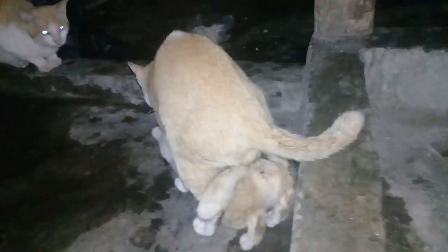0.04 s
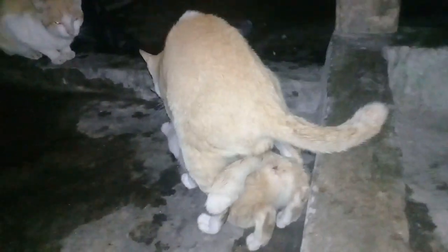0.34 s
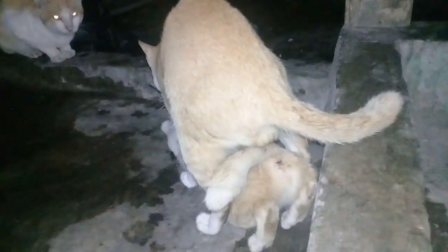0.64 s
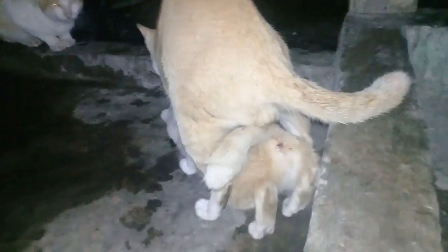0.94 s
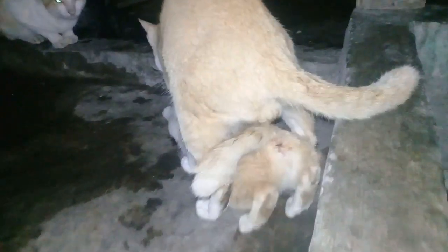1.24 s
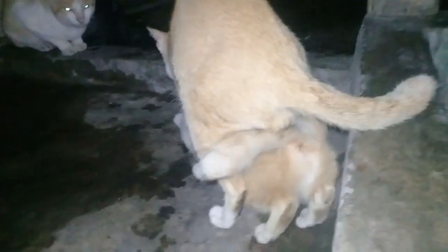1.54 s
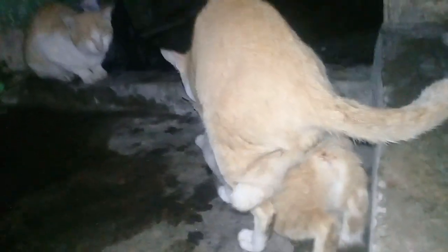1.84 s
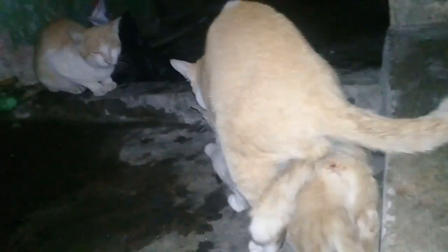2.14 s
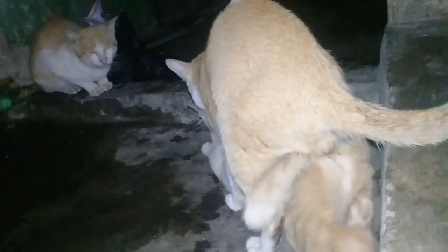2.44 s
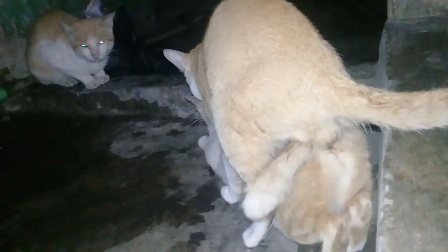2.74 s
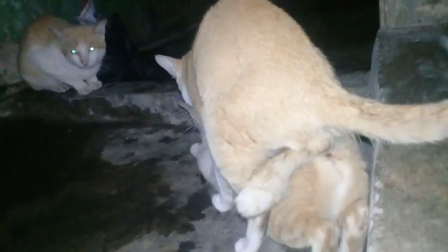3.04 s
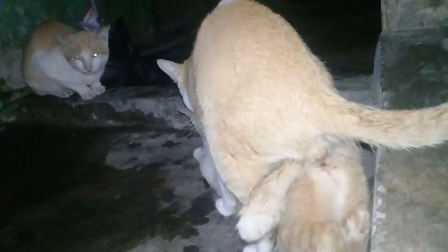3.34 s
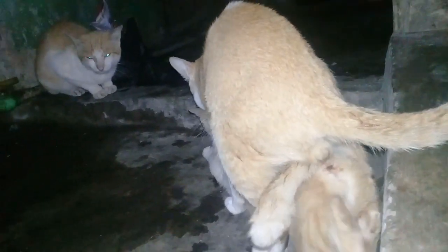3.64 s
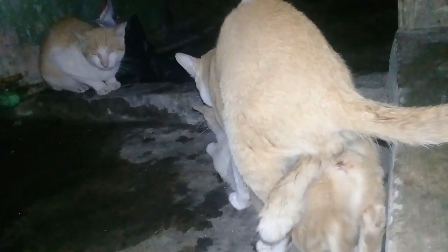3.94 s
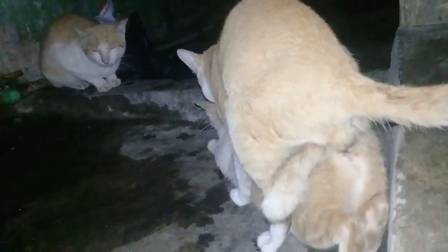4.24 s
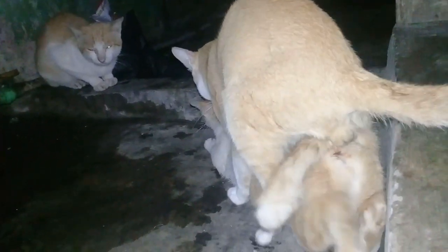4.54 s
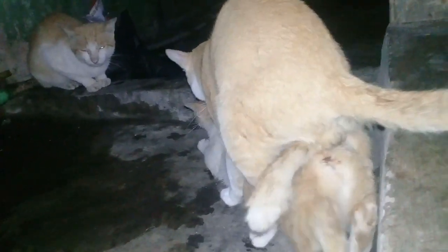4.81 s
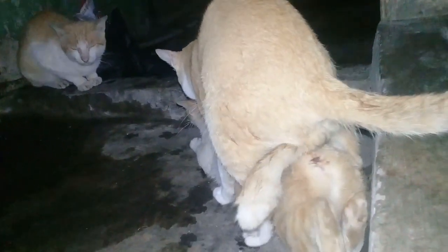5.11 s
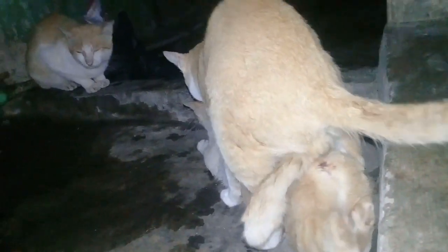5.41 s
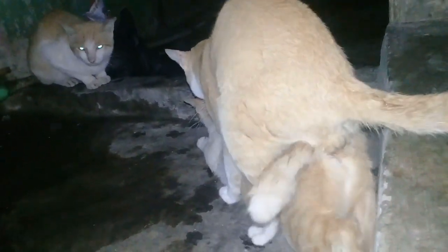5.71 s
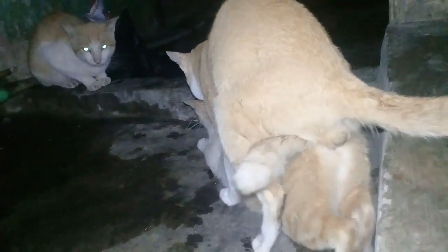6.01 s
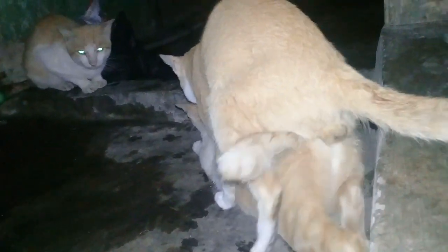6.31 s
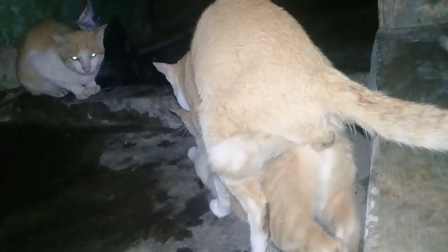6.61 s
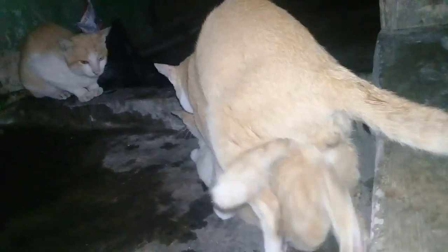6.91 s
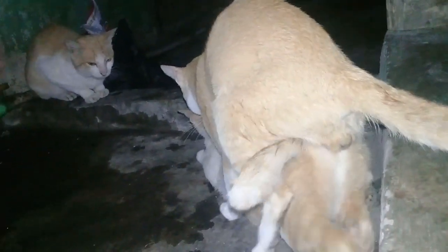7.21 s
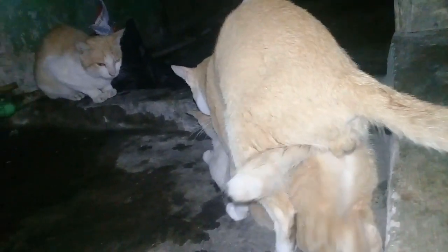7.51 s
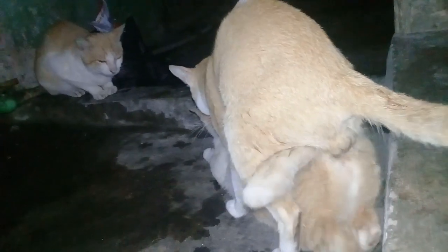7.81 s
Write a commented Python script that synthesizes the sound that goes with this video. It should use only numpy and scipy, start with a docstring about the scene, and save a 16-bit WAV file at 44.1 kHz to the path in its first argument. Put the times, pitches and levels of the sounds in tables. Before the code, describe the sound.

Two crickets chirp fast and high throughout, over a faint distant rumble in a yard at night. Close to the microphone, a cat gives a few small whimpers, then a moan that sinks into a low rough growl. After a pause it growls again, and after another it lets out a louder long yowl that rises and falls. A soft paw scuff and a few claw ticks sound on concrete.

```python
"""Cat yowling in a yard at night

Close to one microphone, a cat whimpers, moans down into a growl, growls again, then gives a loud
arching yowl. Its vocal folds run clean at high pitch and fall into strong-weak, uneven pulses when
low. Two crickets, one near and one farther off, scrape their wings throughout, each at its own rate.
Paws scuff and tick on the concrete, over a faint far rumble."""
import sys
import numpy as np
from scipy import signal
from scipy.fft import rfft, irfft, next_fast_len
from scipy.io import wavfile
from scipy.ndimage import uniform_filter1d

SR = 44100
rng = np.random.default_rng(int(sys.argv[2]) if len(sys.argv) > 2 else 0)


def digitize_waveform(pressure):
    """Quantize a signal to 16-bit integers and store it at the path in sys.argv[1].

    Rows of a 2-D input are taken as channels; values are limited to [-1, 1].
    """
    field = np.atleast_2d(pressure).T
    bounded = np.clip(field, -1, 1)
    quanta = np.round(bounded * 32767).astype(np.int16)
    wavfile.write(sys.argv[1], SR, quanta)


N = 346613
TIME = np.arange(N) / SR


def gain_of(db):
    """Decibels to gain."""
    return 10 ** (np.asarray(db) / 20)


def unit_rms(x):
    """Scales to rms 1."""
    return x / np.sqrt(np.mean(x ** 2) + 1e-20)


def levelled(x, span_s=0.35):
    """Holds the running rms at 1."""
    size = max(int(span_s * SR), 8)
    power = uniform_filter1d(uniform_filter1d(x ** 2, size), size)
    return x / np.sqrt(abs(power) + 1e-14)


def add(mix, s, sound):
    """Mixes a sound in at time s."""
    part = mix[max(round(s * SR), 0):][:len(sound)]
    part += sound[:len(part)]


def swell(curve):
    """Gain along (time [s], level [dB]) points, silent outside them."""
    s, db = np.transpose(curve)
    edges = np.clip(np.minimum(TIME - s[0], s[-1] - TIME) / 0.0027, 0, 1)
    return gain_of(np.interp(TIME, s, db)) * edges


def gate(start, end, attack_s, release_s=.02):
    """Rises from start, holds at 1, and dies away after end."""
    return np.clip((TIME - start) / attack_s, 0, 1) * np.exp(-np.clip((TIME - end) / release_s, 0, 20))


def band(x, lo_hz, hi_hz, order=2):
    """Band-pass."""
    return signal.sosfilt(signal.butter(order, [lo_hz, hi_hz], "band", fs=SR, output="sos"), x)


def colour(x, points):
    """Minimum-phase filter through (frequency [Hz], gain [dB]) points."""
    hz, db = np.transpose(points)
    f = abs(np.fft.fftfreq(8192, 1 / SR))
    log_gain = np.log(gain_of(np.interp(np.log(f + 1), np.log(hz), db)))
    taps = np.fft.ifft(np.exp(np.conj(signal.hilbert(log_gain)))).real
    return signal.oaconvolve(x, taps[:len(f) // 2])[:len(x)]


def resonate(x, hz, width_hz):
    """A resonance that follows the curve hz, applied twice for steep skirts."""
    turn = np.exp(2j * np.pi * np.cumsum(hz) / SR)
    r = np.exp(-np.pi * width_hz / SR)
    return 2 * (turn * signal.lfilter([(1 - r) ** 2], [1, -2 * r, r * r], x / turn)).real


def wander(per_s):
    """Smooth random drift of rms 1."""
    size = next_fast_len(N, True)
    f = np.fft.rfftfreq(size, 1 / SR)
    return unit_rms(irfft(rfft(rng.standard_normal(size)) * np.exp(-(f / per_s) ** 2), size)[:N])


def yard(x, t60, delay_s=.004, before="constant"):
    """Scattered echoes off walls and ground; before="wrap" for a song that is already going."""
    t = np.arange(SR // 2) / SR
    reflections = rng.standard_normal(len(t)) * (rng.random(len(t)) < .1)
    taps = reflections * gain_of(-60 * t / t60) * (t > delay_s)
    return signal.oaconvolve(np.pad(x, (len(t) - 1, 0), before), taps / np.linalg.norm(taps), "valid")


# night air over the yard: (frequency [Hz], relative level [dB])
AIR_SPECTRUM = [(20, -23.5), (50, -6.5), (110, 1.5), (170, -3.5), (250, -15.5), (400, -24), (800, -27),
                (1800, -31.5), (2500, -27.5), (3300, -33.5), (5000, -37), (9500, -37.5), (14000, -36.5)]
# a hum in the distance: (pitch [Hz], relative level [dB])
FAR_HUM = [(113.0, -69)]
def night_air(air_db=-64, hum_trim_db=-2):
    """Far rumble and faint hiss behind everything, with a wavering hum."""
    rumble = unit_rms(colour(rng.standard_normal(N), AIR_SPECTRUM))
    air = rumble * gain_of(air_db + .5 * wander(per_s=16))
    for hz, db in FAR_HUM:
        peak = np.sqrt(2) * gain_of(db + hum_trim_db + 3.8 * wander(per_s=4))
        air += peak * np.sin(2 * np.pi * np.cumsum(hz + 3 * wander(per_s=5)) / SR)
    return air


def chirp_times(running_count):
    """Time of every chirp, spaced evenly between the counted points."""
    s, count = np.transpose(running_count)
    return np.interp(np.arange(count[-1]), count, s)


def chirps(times, gains, strokes, scatter_hz, scatter_db):
    """Each wing stroke drags a scraper over a file: a short tone that slides down."""
    song = np.zeros(N)
    for s, gain in zip(times, gains):
        for offset, length, start_hz, end_hz, db in strokes:
            shift, weakness = rng.standard_normal(2)
            hz = np.linspace(start_hz, end_hz, int(length * SR)) + scatter_hz * shift
            tone = np.sin(2 * np.pi * np.cumsum(hz) / SR) * signal.windows.tukey(len(hz), .75)
            add(song, s + offset - length / 2, gain * gain_of(db - scatter_db * weakness) * tone)
    return song


# pace of the far cricket: (time [s], chirps so far [count])
FAR_PACE = [(.047, 0), (2.018, 17), (3.87, 33), (5.376, 46), (6.736, 58), (7.887, 68)]
# its strength: (time [s], relative level [dB])
FAR_STRENGTH = [(0, -39), (2, -39.5), (3.5, -40.5), (5, -40.5), (6.5, -40), (7.8, -40.5)]
# wing strokes of a chirp: (offset [s], length [s], start pitch [Hz], end pitch [Hz], gain [dB])
FAR_WINGS = [(-.0195, .006, 7420, 7410, -11), (-.0005, 0.011, 7916, 6967, -9.5)]
def far_cricket(wet_db=3, direct_db=-1, paths=4):
    """Farther off, higher and faster; heard mostly through echoes that change from chirp to chirp."""
    s = chirp_times(FAR_PACE)
    gains = gain_of(np.interp(s, *np.transpose(FAR_STRENGTH)))
    path = rng.integers(0, paths, len(s))
    songs = [chirps(s[path == k], gains[path == k], FAR_WINGS, scatter_hz=65, scatter_db=1)
             for k in np.unique(path)]
    return sum(gain_of(direct_db) * song + gain_of(wet_db) * yard(song, t60=0.32, before="wrap")
               for song in songs)


# pace of the near cricket, about eight chirps a second: (time [s], chirps so far [count])
NEAR_PACE = [(.106, 0), (1.650, 12), (2.021, 15), (2.641, 20), (3.276, 25), (4.302, 33), (4.568, 35),
             (5.972, 46), (6.746, 52), (7.893, 61)]
# wing strokes of a chirp: (offset [s], length [s], start pitch [Hz], end pitch [Hz], gain [dB])
NEAR_WINGS = [(-.0385, .007, 6550, 6280, -17), (-.0213, .0075, 6950, 6500, -4),
              (-.0006, .0105, 7030, 6650, 0), (.003, .005, 6500, 6200, -15)]
# cover between it and the microphone: (time [s], share of the song scattered [0-1])
NEAR_COVER = [(0, 0.73), (.9, 0.42), (1.5, 0.43), (2.1, 0.24), (2.8, 0.14)]
def near_cricket(open_db=-40, cover_loss_db=5, echo_s=0.0081, echo_db=-10, wet_db=-48.5):
    """Nearby, coming out from cover, with one flickering wall echo and a thin tail from the yard."""
    s = chirp_times(NEAR_PACE)
    hidden = np.interp(TIME, *np.transpose(NEAR_COVER))
    gains = gain_of(open_db - cover_loss_db * np.interp(s, TIME, hidden))
    song = chirps(s, gains, NEAR_WINGS, scatter_hz=5.2, scatter_db=0.5)
    outline = abs(signal.hilbert(song, next_fast_len(N))[:N])
    flicker = levelled(band(rng.standard_normal(N), 6450, 6950, order=3), span_s=0.0011) / np.sqrt(2)
    echo = np.interp(TIME - echo_s, TIME, outline, left=0) * flicker
    arriving = np.sqrt(1 - hidden) * song + np.sqrt(hidden) * yard(song, t60=0.18, delay_s=0)
    detuned = chirps(s, np.ones(len(s)), NEAR_WINGS, scatter_hz=70.4, scatter_db=0)
    tail = yard(detuned, t60=0.63, delay_s=0.0085, before="wrap")
    return arriving + gain_of(echo_db) * echo + gain_of(wet_db) * tail


def crickets(scrape_db=-24, octave_db=-42):
    """Both songs and the noise of the scraping files, radiated by the wings, with a faint octave."""
    songs = near_cricket() + far_cricket()
    strength = np.sqrt(abs(uniform_filter1d(songs ** 2, size=400)))
    scrape = gain_of(scrape_db) * unit_rms(band(rng.standard_normal(N), 5730, 8200, order=4))
    octave = gain_of(octave_db) * unit_rms(band(rng.standard_normal(N), 13000, 14200))
    return band(songs, 6050, 8500, order=4) + strength * (scrape + octave)


# a paw scuffs the concrete: (time [s], level [dB])
PAW_SCUFF = [(.1, -89), (.3, -77.5), (.39, -71.5), (.46, -83), (.65, -83)]
# claws strike it: (time [s], relative level [dB], brightness [0-1])
CLAW_TICKS = [(0.7775, -51, 0.24), (2.7044, -60, 0.05), (2.9658, -45.5, 0.91), (4.3444, -60, .8),
              (7.2355, -48, 0.9)]
# colour of a ringing tick and of a bright one: (frequency [Hz], gain [dB])
CLAW_RING = [(2000, -35), (2700, -22), (3100, 10), (4600, -1.5), (5600, -1), (9000, -32)]
CLAW_SNAP = [(1500, -19), (3000, -7), (5000, -8), (9000, -10), (14000, -17.5)]
def paws(tick_trim_db=2, decay_s=0.0012, wet_db=-4):
    """One soft scuff on the concrete, then sharp claw ticks with a short echo off the yard."""
    ticks, t = np.zeros(N), np.arange(SR // 50) / SR
    for s, db, bright in CLAW_TICKS:
        blow = gain_of(db + tick_trim_db) * np.exp(-t / decay_s) * rng.choice([-1, 1], len(t))
        add(ticks, s, (1 - bright) * colour(blow, CLAW_RING) + bright * colour(blow, CLAW_SNAP))
    scuff = unit_rms(band(rng.standard_normal(N), 1460, 4200) * gain_of(1.5 * wander(per_s=63)))
    return ticks + gain_of(wet_db) * yard(ticks, t60=.25) + scuff * swell(PAW_SCUFF)


# The cat, close by. A call is (gate, pitch, level, mouth, throat opening); "mouth" is the gain
# of the upper voice over the throat level, and the opening runs from 0 (nearly shut) to 1.
# whimpers; the faint second row is the first whimper's lingering echo:
# (start [s], length [s], pitch [Hz], level [dB], mouth [dB], nasal ring [dB])
WHIMPERS_AND_ECHO = [(1.417, .04, 386, -48, -25, -79), (1.488, .025, 351.7, -59, -19, -90),
                     (1.547, 0.049, 403.3, -45.5, -16, -73), (1.61, 0.1, 385, -47.5, -13.5, -74),
                     (1.699, .095, 359.9, -51, -9, -66.5)]
WHIMPER_ATTACK_S, WHIMPER_RELEASE_S = .016, .012
def whimpers(sag_share=.12, fade_db=2, opening=0.52):
    """Four whimpers and the first one's lingering echo, each sagging in pitch and level."""
    for start, length, hz, db, mouth_db, _ in WHIMPERS_AND_ECHO:
        on = gate(start, start + length, WHIMPER_ATTACK_S, WHIMPER_RELEASE_S)
        progress = np.clip((TIME - start) / length, 0, 1)
        yield on, hz * (1 - sag_share * progress), db - fade_db * progress, mouth_db, opening


def nose(drive):
    """The whimpers ring in the nose; the first one's echo carries a trace of that ring."""
    gain = sum(gain_of(ring_db) * gate(start, start + length, WHIMPER_ATTACK_S, WHIMPER_RELEASE_S)
               for start, length, *_, ring_db in WHIMPERS_AND_ECHO)
    return levelled(band(drive, 900, 1310)) * gain


def vocal_folds(hz, db, taut_hz=206.4, slack_hz=128.1, doubling=0.34, throb_hz=71.87,
                quaver=.007, jitter=.045, shimmer=0.55, rasp=1.6):
    """One pulse and a puff of noise a cycle; slack folds make every second pulse weak and late."""
    slack = np.clip((taut_hz - hz) / (taut_hz - slack_hz), 0, 1)
    softness_db = -46 - db  # low effort roughens slack folds and deepens the throb
    rough = np.clip(.075 + .26 * slack * 2 ** (softness_db / 8), 0, .75)
    unsteady_hz = hz * (1 + quaver * wander(per_s=70) + jitter * rough * wander(per_s=60))
    cycles = np.cumsum(unsteady_hz) / SR
    at = np.flatnonzero(np.diff(np.floor(cycles))) + 1  # first sample of each cycle
    uneven, slip = rng.standard_normal((N // 50, 2))[:len(at)].T
    weak = doubling * slack[at] * (np.arange(len(at)) % 2)
    # a second, slower vibration in the throat sways the size and timing of the pulses
    throb = np.sin(2 * np.pi * np.cumsum(throb_hz + 2.55 * wander(per_s=8)) / SR)
    throb_depth = np.clip(0.21 * 2 ** (softness_db / 9), 0, 1) * (1 - 0.66 * slack)
    size = (1 - weak) * (1 + throb_depth * throb)[at] * np.exp(shimmer * rough[at] * uneven)
    late_cycles = 0.26 * weak + 0.031 * throb[at] + 0.091 * rough[at] * slip
    place = at + (late_cycles - cycles[at] % 1) * SR / hz[at]
    pulses = np.bincount(np.clip(np.round(place), 0, N - 1).astype(int), size, N)
    puffs = unit_rms((2 + np.exp(-(cycles % 1))) * rng.standard_normal(N))
    return pulses * np.sqrt(SR / hz) + rasp * np.sqrt(rough) * band(puffs, 750, 8000)


# colour of the throat, nearly shut and wide open: (frequency [Hz], gain [dB])
SHUT_COLOUR = [(40, -48), (85, -17), (130, -5), (195, 9), (260, 1.5), (325, 7), (390, -4.5), (460, -1.5),
               (540, -13.5), (660, -11.5), (740, -19.5), (880, -19), (1020, -38.5), (1400, -51)]
OPEN_COLOUR = [(40, -43.5), (100, -18.5), (165, -8.5), (240, -7.5), (330, 2.5), (420, -2), (495, 3),
               (600, -8.5), (730, -12.5), (880, -19.5), (1000, -29), (1150, -37), (1400, -50.5),
               (2000, -61.5), (3000, -77.5)]
def throat_and_mouth(drive, db, mouth_db, opening, split_hz=580):
    """The throat colours the pulses; the opening mouth lets out the upper voice."""
    throat = (1 - opening) * colour(drive, SHUT_COLOUR) + opening * colour(drive, OPEN_COLOUR)
    low = signal.sosfiltfilt(signal.butter(6, split_hz, fs=SR, output="sos"), throat)
    upper = band(throat - low, 100, 1700)
    return levelled(low) * gain_of(db) + levelled(upper) * gain_of(db + mouth_db)


# the sinking moan and the arching yowl: (time [s], pitch [Hz], level [dB], mouth [dB])
MOAN_GLIDE = [(1.805, 338, -47, -1), (1.885, 305.7, -50.5, -2.5), (1.92, 302.8, -44, -3),
              (1.975, 298.1, -42, -4), (2.06, 255, -43.5, -7.5), (2.32, 264.4, -43, -9),
              (2.57, 250.2, -45.5, -8.5), (2.69, 193.8, -45.5, -21), (2.75, 178.5, -44.5, -13.5),
              (2.84, 135.7, -48, -23.5)]
YOWL_GLIDE = [(6.305, 154.4, -53.5, -19.5), (6.36, 176.3, -41.5, -8), (6.405, 183.3, -43.5, -16),
              (6.46, 208.1, -33, -15), (6.5, 213.2, -40, -15.5), (6.55, 219.9, -35.5, -1.5),
              (6.65, 242.9, -35, -8), (6.78, 247.4, -35, -0.5), (6.82, 247.5, -35.5, -5),
              (6.88, 238.7, -35.5, -2.5), (7.15, 227.6, -35.5, -6), (7.31, 222.1, -40, 0),
              (7.39, 202.3, -35, -12), (7.49, 179.5, -39.5, -7), (7.63, 168.7, -40.5, -7.5),
              (7.78, 156.1, -40.5, -11), (7.86, 135.5, -39.5, -12)]
def moan_and_yowl(moan_opening=0.77, yowl_opening=0.89):
    """Two long gliding calls, sung with the throat well open."""
    for glide, opening in (MOAN_GLIDE, moan_opening), (YOWL_GLIDE, yowl_opening):
        s, *columns = np.transpose(glide)
        hz, db, mouth_db = (np.interp(TIME, s, column) for column in columns)
        yield gate(s[0], s[-1], attack_s=.035), hz, db, mouth_db, opening


# growls, the first running on from the moan:
# (start [s], end [s], pitch [Hz], level [dB], effort slope [dB/s], mouth [dB], throat opening [0-1])
GROWL_NOTES = [(2.81, 3.83, 132.2, -47.5, -3, -17, 0.22), (4.63, 5.614, 129, -47, .5, -20, 0.14)]
# pushes of effort within them: (time [s], boost [dB])
GROWL_PUSHES = [(2.98, 1.5), (3.159, 5), (3.801, 2), (5.038, 2.5), (5.209, 2), (5.525, 3.5)]
def growls(tremor_db=0.55, push_half_s=.035, hz_per_db=3, mouth_per_db=1.07):
    """Held low calls, the first sagging slowly, the second building slowly; wavering effort lifts the pitch and
    parts the lips."""
    for start, end, hz, db, db_per_s, mouth_db, opening in GROWL_NOTES:
        effort = db_per_s * (np.clip(TIME, start, end) - start) + tremor_db * wander(per_s=10)
        effort += sum(boost * np.exp(-((TIME - s) / push_half_s) ** 2)
                      for s, boost in GROWL_PUSHES if start < s < end)
        on = gate(start, end, attack_s=.07)
        yield on, hz + hz_per_db * effort, db + effort, mouth_db + mouth_per_db * effort, opening


# the teeth are bared in the loud yowl: (time [s], relative level [dB])
SNARL_SWELL = [(6.49, -91.5), (6.57, -73), (6.78, -66), (7.29, -73), (7.36, -82), (7.66, -91)]
CRACK_S, CRACK_HALF_S = 6.79, .035  # the voice cracks at the top of the yowl
def bared_teeth(burst_db):
    """Gain of the snarl, with a burst where the voice cracks."""
    return swell(SNARL_SWELL) * gain_of(burst_db * np.exp(-((TIME - CRACK_S) / CRACK_HALF_S) ** 2))


# rings of the bared mouth: (frequency [Hz], width [Hz], gain [dB], slope [dB/s])
SNARL_RINGS = [(2494, 375, 0, -4.5), (3793, 260, -.5, 2.5)]
# the lips close: (time [s], factor on the ring frequencies [ratio])
LIP_CLOSING = [(6.55, 1.044), (6.8, 0.998), (7, 0.99), (7.3, 0.99)]
def snarl(drive):
    """The bared mouth adds two high rings, which sink as the lips close."""
    lips = np.interp(TIME, *np.transpose(LIP_CLOSING))
    rings = sum(levelled(resonate(drive, hz * lips, width)) * gain_of(db + db_per_s * (TIME - CRACK_S))
                for hz, width, db, db_per_s in SNARL_RINGS)
    return rings * bared_teeth(burst_db=7)


def voice_crack(hiss_db=-10):
    """A fluttering hiss that rides on the snarl and bursts out where the voice cracks."""
    hiss = unit_rms(band(rng.standard_normal(N), 920, 2600) * gain_of(2.8 * wander(per_s=140)))
    return gain_of(hiss_db) * hiss * bared_teeth(burst_db=10)


def cat(tremor_db=1.1, mouth_tremor_db=1.66):
    """One voice makes all the calls, each handing over to the next; level and mouth never hold still."""
    gates, *controls = zip(*whimpers(), *moan_and_yowl(), *growls())
    gates = [on + 1e-9 for on in gates]  # keeps the blend defined between calls
    sounding = sum(gates)
    hz, db, mouth_db, opening = (sum(on * value for on, value in zip(gates, control)) / sounding
                                 for control in controls)
    db += 20 * np.log10(np.minimum(sounding, 1)) + tremor_db * wander(per_s=44)
    mouth_db += mouth_tremor_db * wander(per_s=7.6)
    drive = vocal_folds(hz, db)
    hiss = rng.standard_normal(N)
    voice = throat_and_mouth(drive, db, mouth_db, opening)
    return voice + nose(drive + 0.12 * hiss) + snarl(drive + 0.46 * hiss) + voice_crack()


def scene(cat_wet_db=-13):
    """One microphone in the yard: the cat close by, the walls answering, the crickets around it."""
    voice = cat()
    echoes = gain_of(cat_wet_db) * yard(voice, t60=0.55)
    return (voice + echoes + crickets() + paws() + night_air())[None]


def record(dry, edge_hz=15750, fade_s=.012):
    """The recorder's band limit, with a soft end."""
    faded = dry * np.clip((TIME[-1] - TIME) / fade_s, 0, 1)
    low_pass = signal.firwin(511, edge_hz, window=("kaiser", 9), fs=SR)
    return signal.oaconvolve(faded, low_pass[None], "same")


dry = scene()
out = record(dry)
digitize_waveform(out)
```